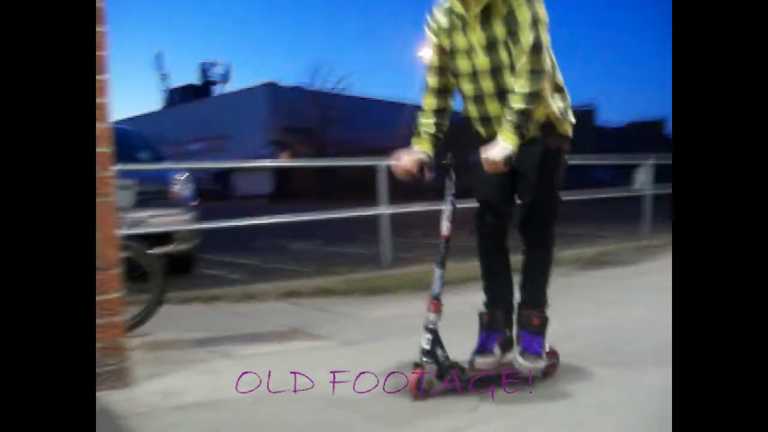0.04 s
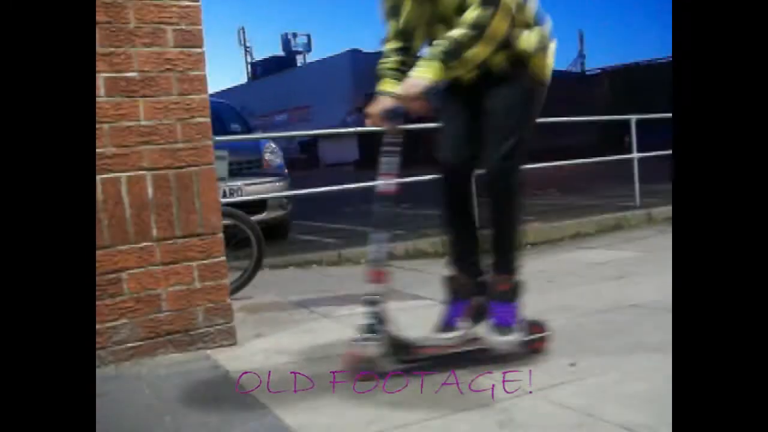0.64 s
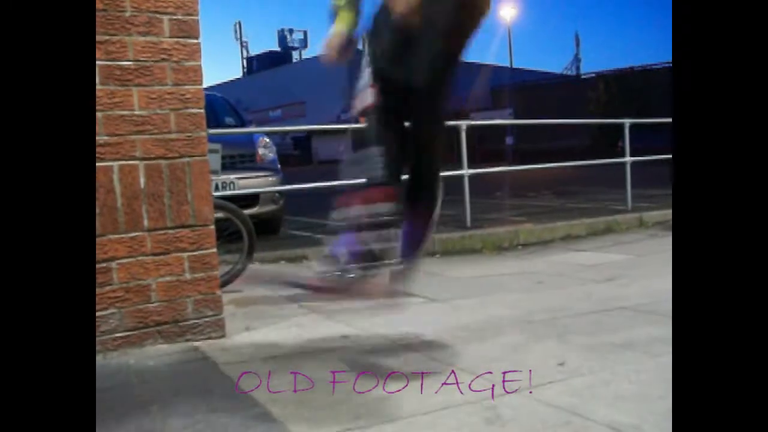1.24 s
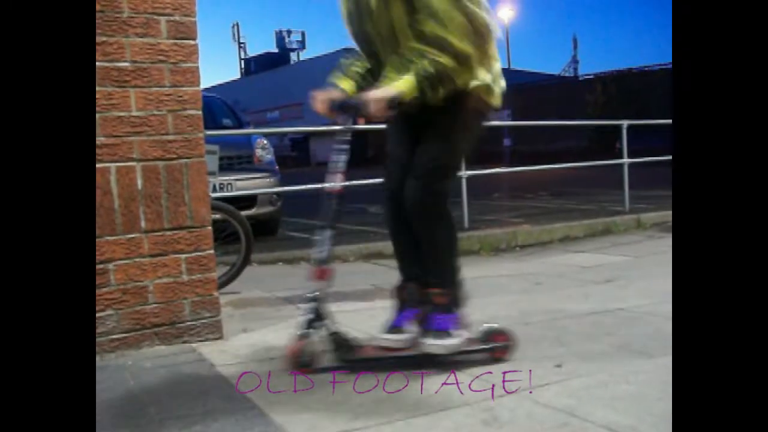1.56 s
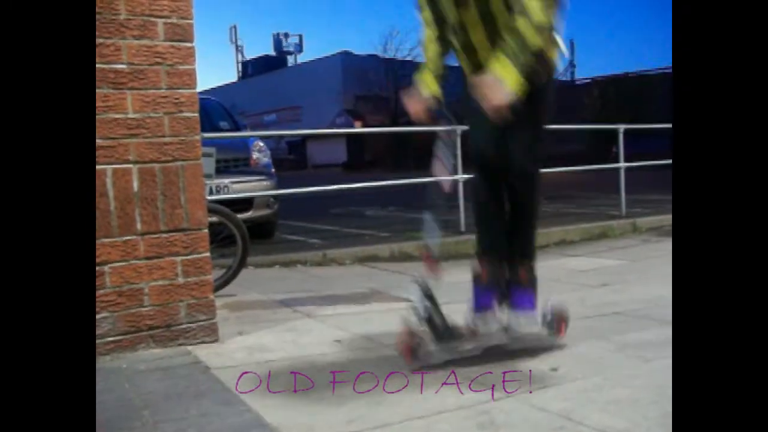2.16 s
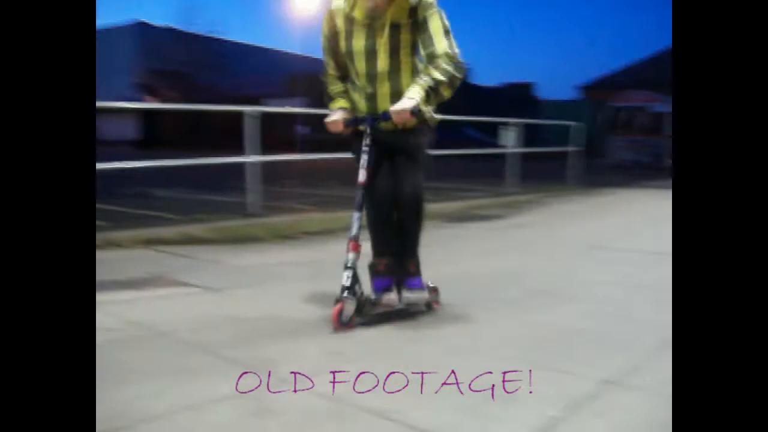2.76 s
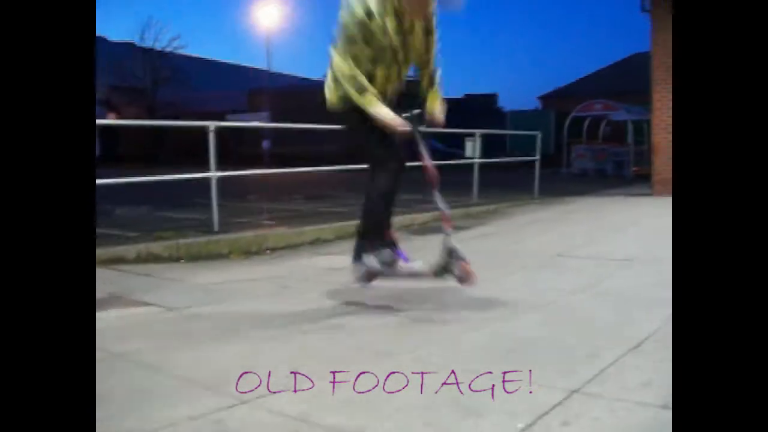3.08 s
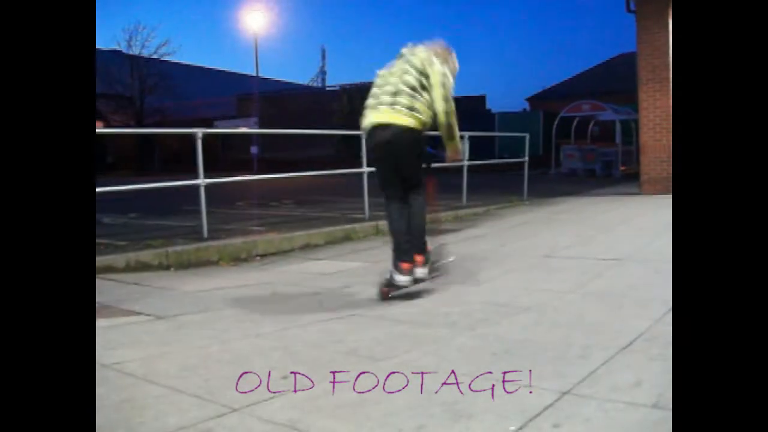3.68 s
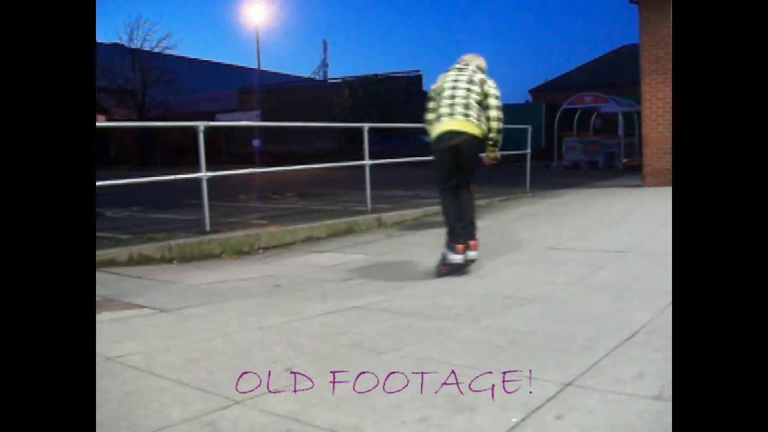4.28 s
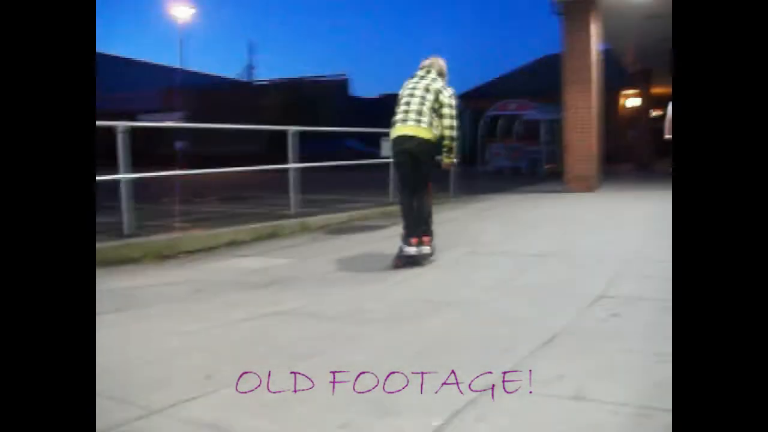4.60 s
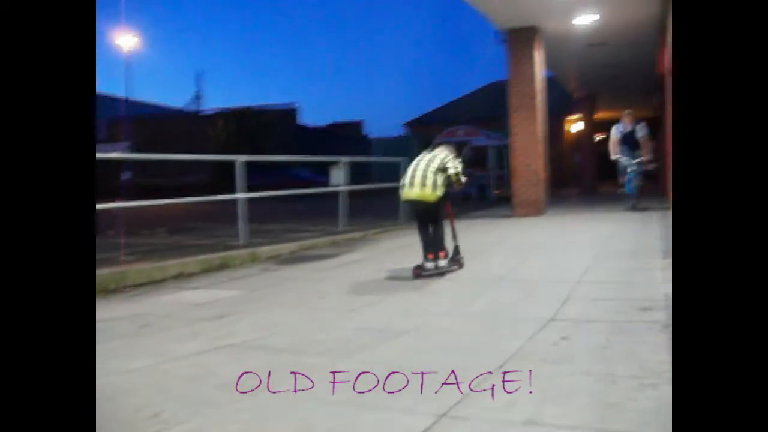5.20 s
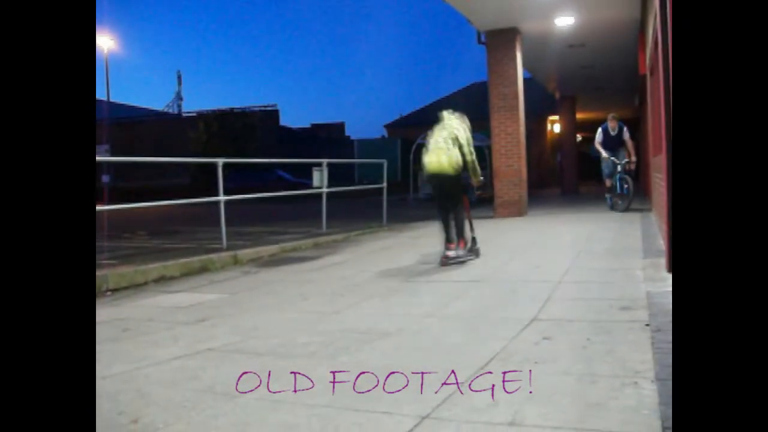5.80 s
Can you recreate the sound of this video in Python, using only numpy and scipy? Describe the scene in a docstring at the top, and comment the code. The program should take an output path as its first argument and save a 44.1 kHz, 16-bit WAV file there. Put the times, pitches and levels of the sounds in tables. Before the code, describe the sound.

A stunt scooter rumbles over concrete, clattering and rattling through three hops, while wind buffets the microphone.

```python
"""A stunt scooter rolls in over concrete paving at dusk: wheels rumble over grit, slabs drum and the
loose brake jingles, with faint whistles. A dry tap sounds close by. The scooter hops three times;
take-offs and landings knock deck and bars, rattle their loose parts and echo off a brick wall. Midway
come one bright click and a tight turn past the microphone; last, it rides away, whistling faintly.
Throughout, wind buffets the microphone of a small, narrow-band camera."""
import sys
import numpy as np
from scipy import signal
from scipy.fft import rfft, irfft
from scipy.io import wavfile
from scipy.ndimage import uniform_filter1d

SR = 44100
rng = np.random.default_rng(int(sys.argv[2]) if len(sys.argv) > 2 else 0)


def to_wav(sig):
    """Store sig (one row per channel, or 1-D mono) as 16-bit WAV at the path in sys.argv[1].

    Samples outside -1..1 are clipped; the rate is SR.
    """
    pcm = np.clip(np.atleast_2d(sig), -1, 1) * 32767
    pcm = np.round(pcm).astype(np.int16)
    wavfile.write(sys.argv[1], SR, pcm.T)  # frames by channels


N = 257524
TIME = np.arange(N) / SR

# Blows: start_s, level_db, rider_weight_db, ring_hz, ring_db, rattle_db (last three levels relative)
BLOWS = [(0.236, -39, -25, 2620, 0.5, -8), (0.301, -41.5, 3, 2750, -4, -4.5),
         (0.605, -48.5, -9, 4300, -7, -23.5), (1.077, -32, -20, 2970, -8, -14),
         (1.133, -30, -21, 2890, 6, -7), (1.157, -29.5, -6.5, 900, -0.5, 5),
         (1.168, -22, -15, 2750, -1.5, -10.5), (1.186, -27.5, -9.5, 873, 5.5, -13),
         (1.234, -36, -2, 2670, -5, 2), (1.466, -39, -1.5, 4200, 0, -10), (1.507, -30, -8.5, 3520, 0.5, 2),
         (1.518, -21.5, -4.5, 3600, -9, -13.5), (1.554, -10, -0.5, 2450, -1, -18.5),
         (1.574, -30, 3, 1400, 10, 2.5), (1.61, -20.5, 3.5, 1400, -8.5, -2.5),
         (1.649, -29, -5.5, 5000, -2, -16), (1.674, -28.5, -24, 2970, 1.5, -13),
         (1.728, -44, 1, 1286, 20, -4), (1.972, -34.5, -17.5, 3180, 3.5, -5),
         (1.985, -22, -15, 3040, -1, -14), (2.109, -27.5, -18, 3890, -16, -4.5),
         (2.117, -30.5, -12.5, 4200, -5.5, -18.5), (2.141, -33.5, -6, 3900, -4, -10.5),
         (2.217, -34, -14.5, 3930, -4.5, -10), (2.248, -24.5, 7.5, 2450, -2.5, 2),
         (2.336, -33, 0.5, 2640, 1, -10.5), (2.518, -48.5, 13.5, 674, 2.5, -10),
         (2.692, -40.5, -0.5, 5330, -5.5, -18), (2.913, -28.5, -17.5, 3050, -0.5, 0.5),
         (2.929, -23.5, -15.5, 850, -0.5, -3.5), (3.074, -38, -5.5, 780, 4, 1),
         (3.099, -32, -16.5, 4000, -6.5, -2), (3.112, -34.5, 7, 1000, -3, -13),
         (3.2368, -15, 6, 2660, -3.5, -20.5), (3.25, -28.5, 6.5, 680, 7.5, 0.5),
         (3.265, -35, 16.5, 215, 15, 2), (3.322, -22, -3.5, 2680, 4, -13),
         (3.657, -32.5, -9.5, 3000, 5, -5.5), (3.808, -21, 9.5, 2114, 3.5, -8),
         (3.826, -27, -11, 850, 3, -1), (3.838, -23.5, -14.5, 3170, 4.5, -6.5),
         (3.932, -37, -14, 3600, -5, -6), (3.998, -49.5, 23, 650, 16, -9),
         (4.158, -54, 21.5, 995, 17.5, -16.5), (5.233, -31.5, -14.5, 2930, 14, -8),
         (5.245, -32, 4, 2940, 3.5, -9), (5.273, -28, -10, 2960, 2, -5),
         (5.466, -44.5, -8.5, 3200, 11.5, 4.5), (5.505, -27.5, 0.5, 2800, -11, -0.5)]
# Thud, deck, bar and edge bands: low_hz, high_hz
PART_BANDS = [(68, 370), (470, 1480), (1950, 3400), (3500, 5300)]


def clatter(contact_rise_s=.002, contact_t60_s=0.029, rattle_swell_s=0.021, rattle_t60_s=0.17):
    """Each blow is a brief hard contact; bearings, clamp and brake then chatter and settle."""
    size = 16384
    knock_db, chatter_db, loose_ring_db, loose_weight_db = 5.5, -1, -1, -4.5
    out, t = np.zeros(N), np.arange(size) / SR
    frame = frame_spectrum(size)
    filters = [signal.butter(3, band, "bandpass", fs=SR, output="sos") for band in PART_BANDS]
    bands = np.array([signal.sosfreqz(sos, np.linspace(0, np.pi, len(frame)))[1] for sos in filters])
    push = np.minimum(0.38 + t / contact_rise_s, 1) * decay(t, contact_t60_s)
    for start_s, level_db, weight_db, ring_hz, ring_db, rattle_db in BLOWS:
        force = push * grains(size, rate_hz=6000, spread_db=3.0)
        levels_db = part_levels(level_db, weight_db, ring_hz)
        piece_db = level_db + ring_db
        knock = strike(frame, bands, force, levels_db, ring_hz, piece_db, width_hz=63)
        add(out, start_s, undb(knock_db) * np.linalg.norm(push) * knock)

        age = t / undb(0.14 * weight_db)  # heavier blows rattle longer
        settle = decay(np.maximum(age - rattle_swell_s, 0), rattle_t60_s)
        shake = np.minimum(0.41 + 0.55 * age / rattle_swell_s, 1) * settle
        force = shake * grains(size, rate_hz=800, spread_db=2.0)
        levels_db = part_levels(level_db, weight_db + loose_weight_db, ring_hz)
        chatter = strike(frame, bands, force, levels_db, ring_hz, piece_db + loose_ring_db, width_hz=110)
        add(out, start_s, undb(chatter_db + rattle_db) * np.linalg.norm(shake) * chatter)
    return out


# Deck, fork and bar modes: pitch_hz, energy_db (re bare contact), t60_s
FRAME_MODES = [(86.5, -17.5, 0.095), (122.2, -14, 0.3), (253, -19, 0.02), (368, -21, 0.22),
               (572, -24, 0.053), (691.7, -26, 0.02), (900, -23, 0.037), (967, -27, 0.067),
               (1376, -15.5, 0.024), (1933, -22, 0.021), (2160, -14.5, 0.022), (2610, -3.5, 0.05),
               (2790, -5.5, 0.027), (3012, -8.5, 0.025), (3180, -15.5, 0.0074), (3534, -15.5, 0.0096),
               (3680, -14.5, 0.019), (3890, -17, 0.038), (4220, -28, 0.019)]


def frame_spectrum(size):
    """The frame's response to one contact: a dead crack plus its modes."""
    t = np.arange(size) / SR
    response = np.zeros(size)
    response[0] = 1
    for pitch_hz, energy_db, t60_s in FRAME_MODES:
        ring = np.cos(2 * np.pi * pitch_hz * t) * decay(t, t60_s)
        response += undb(energy_db) * ring / np.linalg.norm(ring)
    return rfft(response, 2 * size)


# Thud, deck, bar and edge balance: offset_db, weight_share
PART_BALANCE = [(0.5, 0.97), (2, 0.3), (2, -0.075), (-3.5, .05)]


def part_levels(level_db, weight_db, ring_hz, stiff_hz=2930, stiff_db_per_oct=12.5):
    """Band levels in dB: weight deepens a contact; a small, stiff piece brightens the edge."""
    offset_db, weight_share = np.transpose(PART_BALANCE)
    stiff_db = stiff_db_per_oct * max(np.log2(ring_hz / stiff_hz), 0)
    return level_db + offset_db + weight_share * weight_db + np.array([0, 0, 0, stiff_db])


def strike(frame, bands, force, levels_db, ring_hz, ring_db, width_hz, detune=0.021):
    """A force rings the frame's four bands and the struck piece, each at its own level."""
    hz = np.linspace(0, SR / 2, len(frame))
    # shifting weight and grip retune the frame
    frame = np.interp(hz * (1 + detune * rng.standard_normal()), hz, frame)
    ring = 1j * hz * width_hz / (ring_hz ** 2 - hz ** 2 + 1j * hz * width_hz)
    sounds = irfft(rfft(force, 2 * len(force)) * np.vstack([bands * frame, ring]))
    part_gains = undb([*levels_db, ring_db]) / np.linalg.norm(sounds, axis=1)
    return np.sum(part_gains[:, None] * sounds, axis=0)


# Rolling, loudest in the turn: time_s, rumble_db, grit_db
ROLL_LEVELS = [(0, -37.5, -49.5), (.45, -38, -52), (.7, -37.5, -46), (1.0, -39.5, -50), (1.4, -33, -44),
               (1.75, -33.5, -40), (1.95, -39, -48), (2.2, -42, -45), (2.4, -33.5, -43), (2.49, -37.5, -48),
               (2.56, -30, -40), (2.68, -33, -34), (3.0, -28, -38), (3.2, -38, -50.5), (3.75, -37.5, -46),
               (4.15, -39, -51.5), (5.0, -38, -52), (5.84, -34, -47.5)]
# Concrete rumble: freq_hz, level_db
RUMBLE_SPECTRUM = [(76, -14), (130, -8.5), (206, -3.5), (248, -8), (298, -7.5), (328, -9.5), (499, -12.5),
                   (639, -15), (921, -17), (1000, -21), (1700, -29.5), (2210, -42), (3740, -120)]
# Grit crunch: freq_hz, level_db
GRIT_SPECTRUM = [(600, -14), (900, -2.5), (1400, 7), (1800, 2), (2300, 4.5), (2750, 6.5), (3300, -3.5),
                 (4000, -4.5), (5500, -22)]


def wheels():
    """Hard wheels rumble over rough concrete and crunch its grit."""
    rumble_gain, grit_gain = gains(ROLL_LEVELS)
    rumble = rumble_gain * colour(grains(N, rate_hz=2500, spread_db=2.0), RUMBLE_SPECTRUM)
    grit = grit_gain * colour(grains(N, rate_hz=9700, spread_db=6.5), GRIT_SPECTRUM)
    patches = undb(.7 * walk(rate_hz=25))
    return (rumble + grit) * patches


# Drumming, strongest after the turn: time_s, level_db
SLAB_LEVELS = [(0, -49), (1.2, -55), (2.3, -40.5), (2.7, -36), (3.1, -39.5), (3.75, -33), (4.35, -41),
               (4.8, -45), (5.84, -43.5)]
# Slab resonance: freq_hz, level_db
SLAB_SPECTRUM = [(95, -5), (130, 1), (190, -1), (290, -10), (400, -20.5)]


def slabs():
    """Paving slabs drum dully under the wheels."""
    return gains(SLAB_LEVELS)[0] * colour(grains(N, rate_hz=300, spread_db=4), SLAB_SPECTRUM)


# Brake jolts: start_s, t60_s, level_db
BRAKE_JOLTS = [(0.147, 0.024, -36), (0.206, 0.39, -42), (0.826, 0.28, -44), (0.935, 0.049, -40.5),
               (1.172, 0.24, -32.5), (1.29, 0.45, -48), (2.385, .1, -36), (5.1, 0.098, -45)]
# Brake ring: freq_hz, level_db
BRAKE_SPECTRUM = [(2000, -18), (2450, -14), (2630, 5.5), (2850, -3), (3200, -17.5), (4500, -22.5)]


def brake_jingle(swell_share=.12):
    """Bumps shake the loose rear brake; each jingle swells, then settles."""
    envelope = np.zeros(N)
    for start_s, t60_s, level_db in BRAKE_JOLTS:
        age_s, swell_s = np.maximum(TIME - start_s, 0), swell_share * t60_s
        swell = np.minimum(age_s / swell_s, 1)
        envelope += undb(level_db) * swell * decay(np.maximum(age_s - swell_s, 0), t60_s)
    return envelope * colour(grains(N, rate_hz=700, spread_db=6), BRAKE_SPECTRUM)


# Tap contacts: start_s, peak_db
TAP_CONTACTS = [(0.7906, -11.5), (0.7918, -17.5), (0.7959, -22)]
# Hollow body modes: pitch_hz, level_db, t60_s
TAP_MODES = [(524, -9, 0.025), (855, -6, 0.018), (1150, 1.5, 0.036), (1400, 2, 0.029), (1640, 0.5, 0.0089),
             (2000, -0.5, 0.014), (2620, 1, 0.0069), (3100, -7.5, 0.012), (3850, -0.5, 0.0081)]


def tap(size=4096):
    """Something small and hard ticks against a hollow body; the ring dies at once."""
    out, t = np.zeros(N), np.arange(size) / SR
    # adjacent modes swing in antiphase
    ring = sum((-1) ** k * undb(level_db) * np.sin(2 * np.pi * pitch_hz * t) * decay(t, t60_s)
               for k, (pitch_hz, level_db, t60_s) in enumerate(TAP_MODES))
    for start_s, peak_db in TAP_CONTACTS:
        add(out, start_s, undb(peak_db) * ring / np.max(np.abs(ring)))
    return out


# Click treble: freq_hz, level_db
CLICK_SPECTRUM = [(5500, -0.5), (8000, -3), (11000, -11.5), (13500, 3), (15000, -3.5), (16000, -12.5)]


def click(start_s=2.2494, peak_db=-7, decay_s=0.0027, size=256):
    """One very short, bright click."""
    out, t = np.zeros(N), np.arange(size) / SR
    burst = np.exp(-(t / decay_s) ** 2) * colour(rng.standard_normal(size), CLICK_SPECTRUM)
    add(out, start_s, undb(peak_db) * burst / np.max(np.abs(burst)))
    return out


# Whistles: start_s, length_s, start_hz, middle_hz, end_hz, level_db
WHISTLE_GLIDES = [(0.07, .1, 1990, 2000, 1930, -48.5), (.34, 0.16, 2170, 2200, 2220, -49.5),
                  (0.441, 0.24, 1890, 2205, 2215, -43.5), (5.336, 0.36, 2110, 2086, 2105, -45.5),
                  (5.535, 0.4, 2460, 2550, 2610, -44), (5.63, .25, 2590, 2745, 2790, -43.5)]


def whistles():
    """Faint, rough whistles swell, slide in pitch and fade."""
    out = np.zeros(N)
    drift = 1 + .011 * walk(rate_hz=500)
    flutter = undb(2 * walk(rate_hz=110))
    for start_s, length_s, *glide_hz, level_db in WHISTLE_GLIDES:
        progress = np.clip((TIME - start_s) / length_s, 0, 1)
        pitch_hz = np.interp(progress, [0, .5, 1], glide_hz) * drift
        swell = np.minimum(10 * progress * (1 - progress), 1)
        out += undb(level_db) * swell * np.sin(2 * np.pi * np.cumsum(pitch_hz) / SR)
    return out * flutter


# Yard reverberation: freq_hz, level_db
TAIL_SPECTRUM = [(60, -2.5), (250, 7), (1300, 4), (2800, -3), (5500, 5.5)]


def yard(x, wall_s=.013, wall_db=-11, tail_db=-15, t60_s=0.6, rise_s=0.0015):
    """The near brick wall gives one echo; building fronts add a thin tail."""
    t = np.arange(SR) / SR
    tail = colour(rng.standard_normal(SR), TAIL_SPECTRUM) * decay(t, t60_s) * (1 - np.exp(-t / rise_s))
    response = undb(tail_db) * tail / np.linalg.norm(tail)
    add(response, wall_s, np.array([undb(wall_db)]))
    return x + signal.fftconvolve(x, response)[:N]


# Gusts: centre_s, half_width_s, level_db (re breeze)
WIND_GUSTS = [(2.08, 0.033, 3.5), (2.26, 0.036, -1.5), (3.759, 0.069, 8), (4.02, 0.063, 6.5)]
# Wind rumble: freq_hz, level_db
WIND_SPECTRUM = [(20, 5), (31, -5), (45, -5.5), (62, -6), (80, -10), (100, -5), (125, -17), (170, -27.5),
                 (260, -36)]
# Background hiss: freq_hz, level_db
HISS_SPECTRUM = [(100, -9), (800, 7.5), (2000, -11.5), (4000, -2), (5500, -9)]


def wind(breeze_db=-26.5, flutter_db=1.4, hiss_db=-48):
    """A gusty breeze buffets the microphone over an even hiss."""
    gusts_db = sum(level_db * np.exp(-((TIME - centre_s) / half_width_s) ** 2)
                   for centre_s, half_width_s, level_db in WIND_GUSTS)
    envelope = undb(breeze_db + gusts_db + flutter_db * walk(rate_hz=14))
    buffeting = envelope * colour(rng.standard_normal(N), WIND_SPECTRUM)
    return buffeting + undb(hiss_db) * colour(rng.standard_normal(N), HISS_SPECTRUM)


def undb(db):
    """Decibels to gain."""
    return 10 ** (np.asarray(db) / 20)


def unit(x):
    """Scale to rms 1."""
    return x / np.sqrt(np.mean(x ** 2))


def decay(t, t60_s):
    """Exponential fall, 60 dB per t60_s."""
    return np.exp(-np.log(1000) * t / t60_s)


def gains(table):
    """A curve's dB columns as per-sample gains."""
    time_s, *columns_db = np.transpose(table)
    return [undb(np.interp(TIME, time_s, db)) for db in columns_db]


def add(out, start_s, x):
    """Mix x into out at start_s."""
    i = max(int(start_s * SR), 0)
    out[i:i + len(x)] += x[:max(len(out) - i, 0)]


def colour(x, spectrum):
    """Shape x by a spectrum, falling 20 dB per octave beyond its ends; rms 1."""
    hz, db = np.transpose(spectrum)
    octave = np.log2(np.maximum(np.fft.rfftfreq(len(x), 1 / SR), 1))
    outside = np.abs(octave - np.clip(octave, np.log2(hz[0]), np.log2(hz[-1])))
    shape_db = np.interp(octave, np.log2(hz), db) - 20 * outside
    return unit(irfft(rfft(x) * undb(shape_db), len(x)))


def walk(rate_hz):
    """Random steps, smoothed twice; rms 1."""
    hold = int(SR / rate_hz)
    steps = np.repeat(rng.standard_normal(N // hold + 1), hold)
    return unit(uniform_filter1d(uniform_filter1d(steps, hold), hold)[:N])


def grains(size, rate_hz, spread_db):
    """Tiny impacts of random timing and strength; rms 1."""
    hit = rng.random(size) < rate_hz / SR
    strength = undb(spread_db * np.clip(rng.standard_normal(size), -2, 2))
    return unit(hit * strength * np.sign(rng.standard_normal(size)) + 1e-9)


def lowpass(x, cutoff_hz, taps=301):
    """Steep linear-phase low-pass."""
    return signal.fftconvolve(x, signal.firwin(taps, cutoff_hz, fs=SR, window="blackman")[None], "same")


def scene():
    """The scooter in the yard, with a nearby tap and wind; mono."""
    return (yard(clatter() + brake_jingle() + whistles()) + tap() + wheels() + slabs() + wind())[None]


def record(dry, ceiling=.78, band_hz=5470, top_hz=15700, image_db=-59, offset=0.015):
    """The camera rounds the hardest landings and narrows the band; the click joins afterwards."""
    rounded = dry / (1 + (dry / ceiling) ** 4) ** (1 / 4)
    narrow = lowpass(rounded, band_hz)
    # quarter-rate sampling: faint treble images, plus a whine from the offset
    comb = 4 * (np.arange(N) % 4 == 0) - 1
    images = undb(image_db) * comb * (narrow + offset)
    return lowpass(narrow + images + click(), top_hz)


dry = scene()
out = record(dry)
to_wav(out)
```